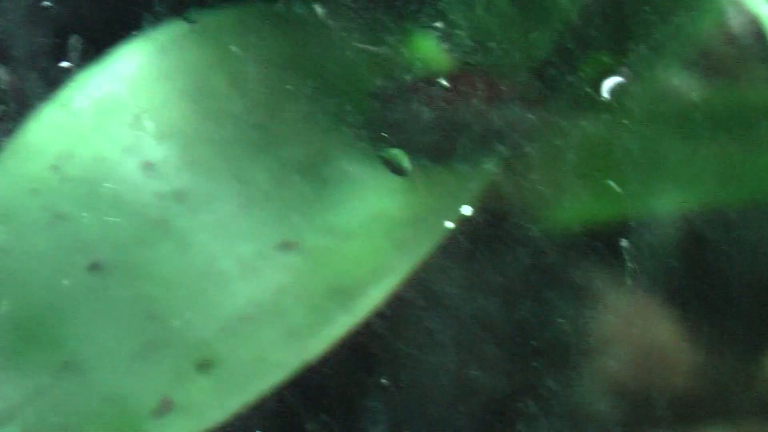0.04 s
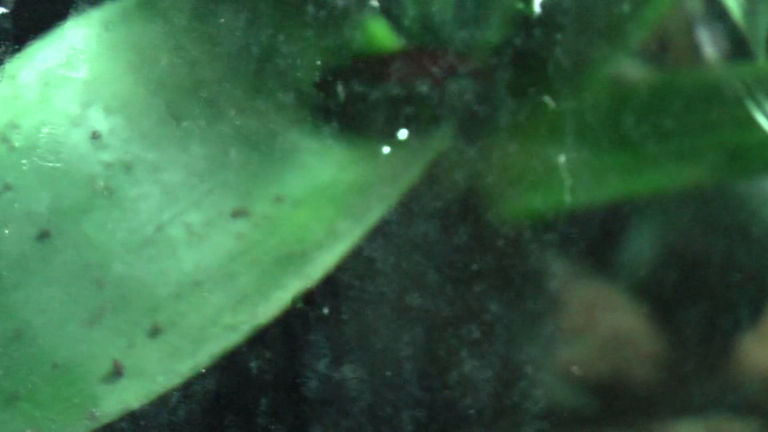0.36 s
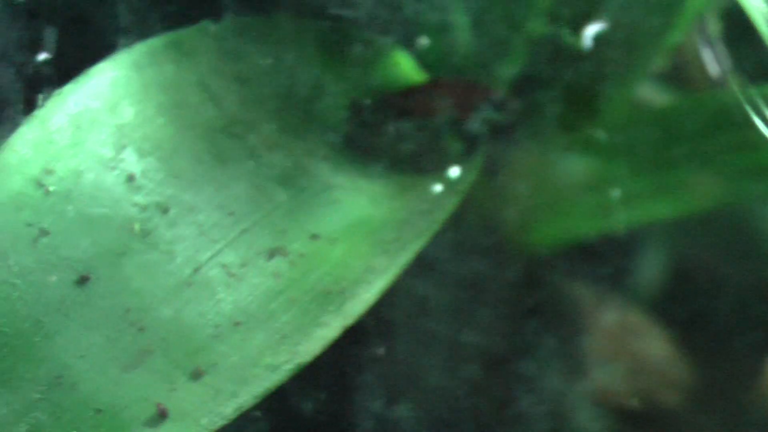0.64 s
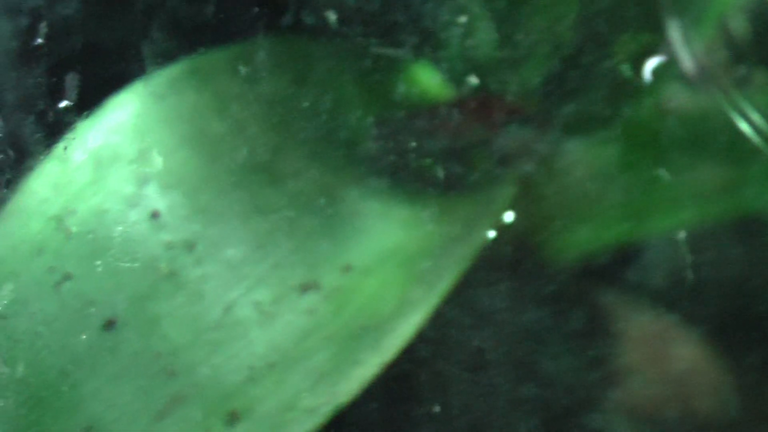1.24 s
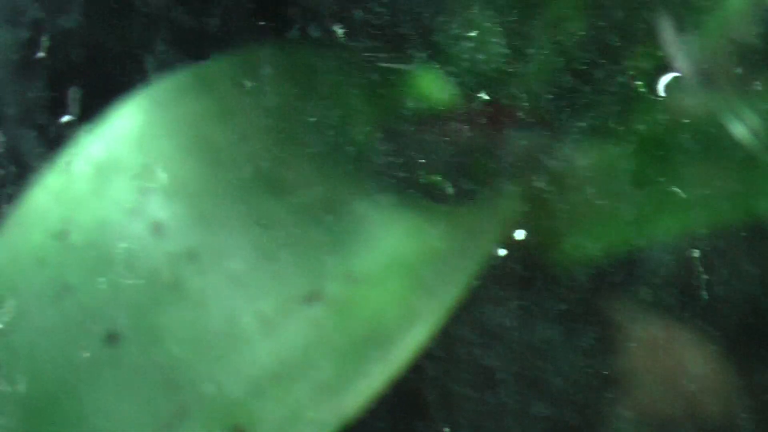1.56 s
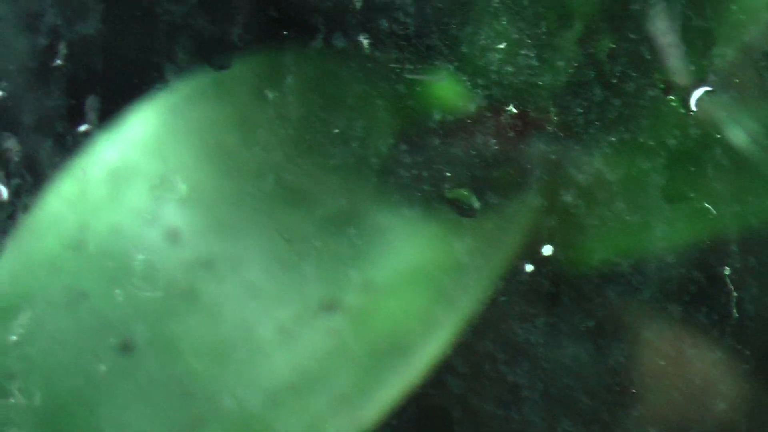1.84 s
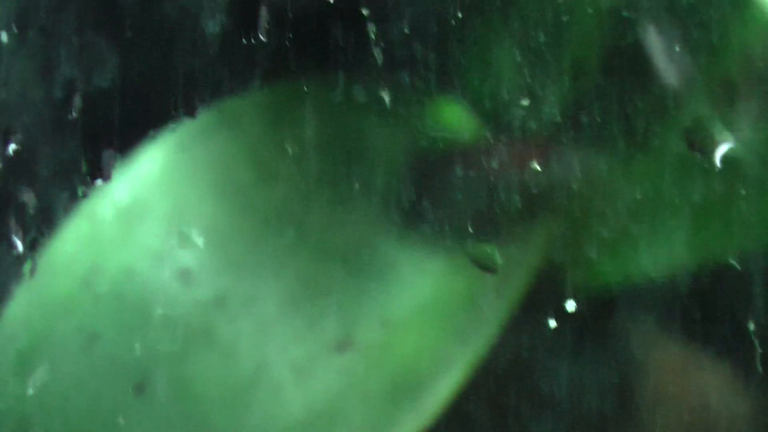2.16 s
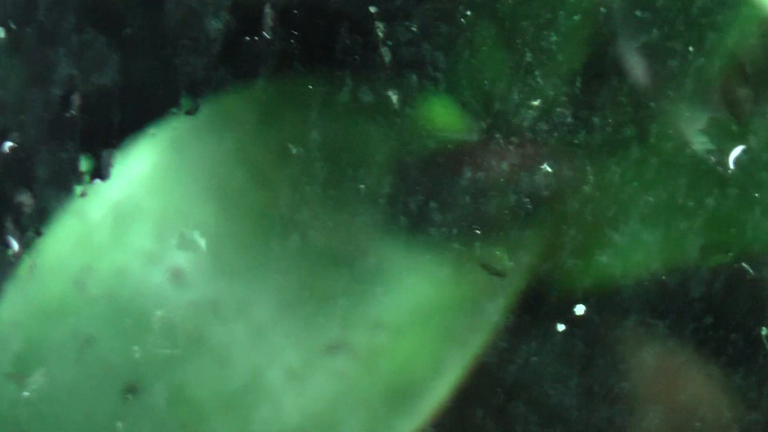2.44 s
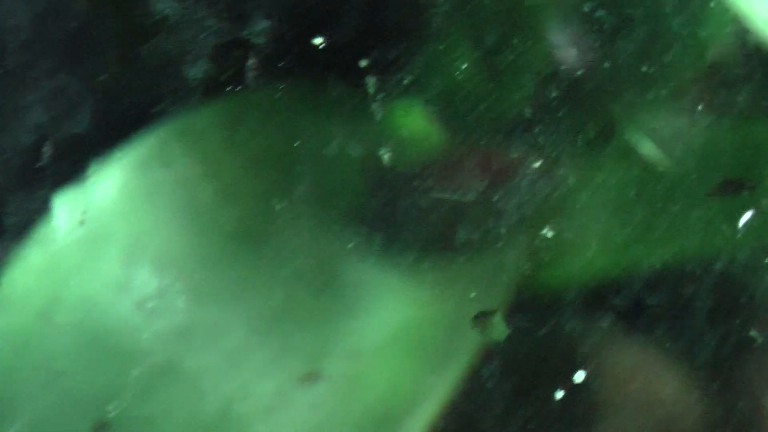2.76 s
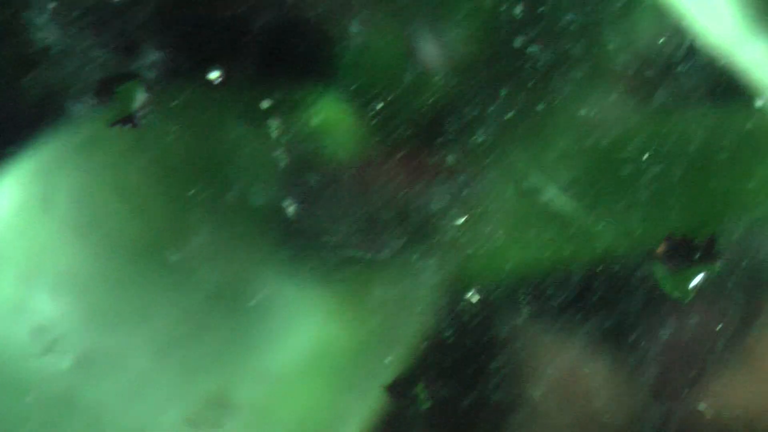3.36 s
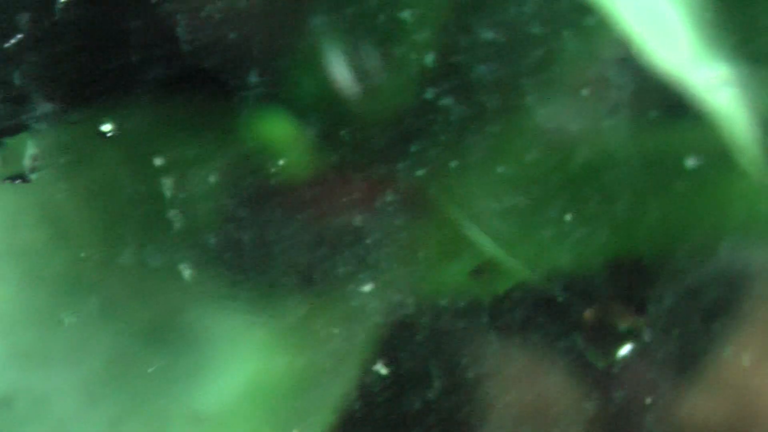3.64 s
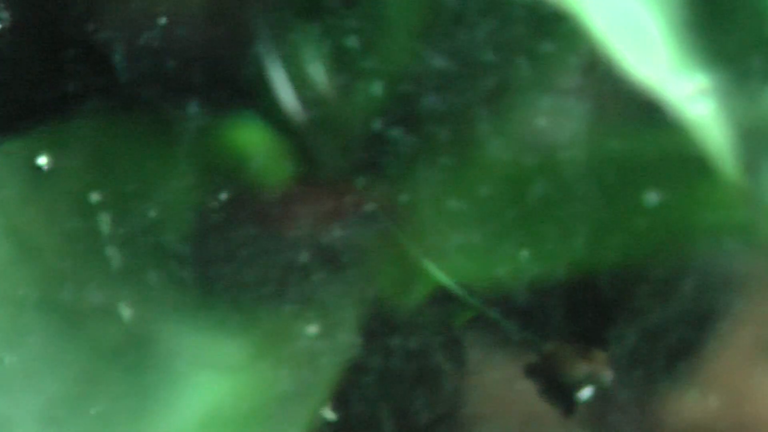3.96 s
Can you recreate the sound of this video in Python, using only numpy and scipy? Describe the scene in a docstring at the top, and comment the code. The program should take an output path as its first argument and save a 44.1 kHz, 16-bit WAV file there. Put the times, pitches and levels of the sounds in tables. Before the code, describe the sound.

A small frog trills close by for the whole four seconds, about eight bright, buzzy notes a second, ringing slightly in a glass terrarium. A quieter second frog trills higher and faster further off, also without pause. Soft knocks and dull bumps come here and there, around 0.1, 0.8, 2, 3.3 and 3.6 seconds. Faint low room noise and electrical hum lie underneath.

```python
"""A bright, buzzing trill, 8.5 notes a second: a poison frog calling inside a glass terrarium.
A second, higher frog trills faster further off. Each note is a burst of short pulses that ring the
vocal sac, and the glass tank smears them into a buzz. Behind the frogs sit a few soft knocks and
bumps, low room noise, a swelling drone and mains hum."""
import sys
import numpy as np
from scipy import signal
from scipy.fft import rfft, irfft
from scipy.io import wavfile
from scipy.ndimage import uniform_filter1d

SR = 44100
rng = np.random.default_rng(int(sys.argv[2]) if len(sys.argv) > 2 else 0)


def transcribe(u):
    """Save the signal u as a 16-bit wav file named by the first command-line argument.

    u: samples, shape (n,) or (channels, n), limited to [-1, 1]; the rate is SR.
    q: integer samples, one column per channel.
    """
    v = np.clip(np.atleast_2d(u).T, -1, 1)
    q = np.round(v * 32767).astype(np.int16)
    wavfile.write(sys.argv[1], SR, q)


N = 176400


def near_frog():
    """The lead trill: notes that swell and fade, each at a slightly different pulse rate."""
    # the call (start [s], relative level [dB], nominal sac pitch [Hz])
    notes = [(-0.019, 1.3, 5180), (0.098, 0.6, 5150), (0.216, 0.2, 5220), (0.332, 0.2, 5210),
             (0.449, -0.8, 5130.0), (0.564, -0.5, 5190), (0.68, 0, 5150), (0.798, -0.3, 5140),
             (0.917, -0.2, 5160), (1.037, 0.2, 5150), (1.15, 0.3, 5110), (1.268, 0.2, 5160),
             (1.381, 0.8, 5140), (1.499, -0.5, 5040), (1.62, 0.6, 5170), (1.746, 0, 5130),
             (1.866, -1.3, 5000), (1.986, -0.7, 5110), (2.108, 1.2, 5220), (2.225, -3.5, 5040),
             (2.344, -0.9, 5050), (2.458, 0, 5140), (2.581, -0.3, 5170.0), (2.702, 0.9, 5200),
             (2.819, -1.1, 5010), (2.936, 0.2, 5070), (3.05, 0.5, 5140), (3.174, 0.1, 5130.0),
             (3.293, 1.5, 5190), (3.407, 0.3, 5050), (3.525, 0.8, 5050), (3.646, 0, 5160),
             (3.768, 0.1, 5100), (3.888, -0.5, 5050)]
    # tone of the voice (frequency [Hz], gain [dB])
    voice_eq = [(1000, -6.5), (2200, -8), (2700, -2.5), (3350, 6), (4000, 0.5), (4500, -0.5), (4850, -4),
                (5200, -8.5), (5700, -5), (6400, -8), (7300, -4.5), (8500, 0), (10000, -1.5), (11200, 4),
                (12500, -3), (16000, -11)]
    trill = np.zeros(N)
    for (start, db, sac_hz), haste in zip(notes, rng.standard_normal(len(notes))):
        note = sac_note(length_s=0.061, attack_s=0.026, release_s=0.039,
                        pulse_hz=395 * (1 + 0.06 * haste), slowing=0.28, jitter=0.06, uneven_db=1.5,
                        sac_hz=sac_hz, scoop=0.27, scoop_s=0.0097, sag=0.13,
                        ring_s=0.00026, octave_ring_s=0.00032, octave_db=-20, bite_db=15)
        add(trill, start, amp(db) * note)
    voice = colour(trill, voice_eq)
    return amp(-46.5) * glass_tank(voice, direct_db=-5.5, modes_db=7.5, width_db=2, build_s=0.00036)


def far_frog():
    """A smaller frog further off: higher and faster, with a sharper attack."""
    # the call (start [s], relative level [dB])
    notes = [(-.03, 2.5), (0.071, -1.5), (.166, 0), (.258, -3.5), (0.344, -3), (0.445, 2), (0.549, -0.5),
             (0.645, 0.5), (.745, -0.5), (0.843, -0.5), (.943, -1), (1.039, -1.5), (1.142, -0.5),
             (1.235, -0.5), (1.336, 0.5), (1.435, 0), (1.53, 0), (1.622, -0.5), (1.72, 0), (1.822, 1),
             (1.917, 1), (2.031, -2), (2.128, -2.5), (2.226, 0.5), (2.325, 0.5), (2.416, -1.5),
             (2.521, -1.5), (2.626, -1), (2.714, -2), (2.817, 1), (2.919, -1), (3.018, 0), (3.115, -0.5),
             (3.207, -1.5), (3.303, -5.5), (3.4, -1), (3.496, -1.5), (3.598, 1), (3.701, -1.5),
             (3.797, -0.5), (3.89, 0)]
    # tone of the voice (frequency [Hz], gain [dB])
    voice_eq = [(1000, -31), (2400, -43), (3400, 6), (4500, 2.5), (5800, -0.5), (6400, -3.5), (7200, -16),
                (10000, 18.5), (13000, -38), (16000, -18)]
    trill = np.zeros(N)
    for (start, db), haste in zip(notes, rng.standard_normal(len(notes))):
        note = sac_note(length_s=0.058, attack_s=0.006, release_s=0.012,
                        pulse_hz=410 * (1 + 0.05 * haste), slowing=0.3, jitter=0.07, uneven_db=2.8,
                        sac_hz=5803, scoop=0.2, scoop_s=0.0039, sag=0.034,
                        ring_s=0.0003, octave_ring_s=0.00034, octave_db=-35, bite_db=3)
        add(trill, start, amp(db) * note)
    voice = colour(trill, voice_eq)
    return amp(-55) * glass_tank(voice, direct_db=-1.5, modes_db=12, width_db=-1, build_s=0.0042)


def sac_note(length_s, attack_s, release_s, pulse_hz, slowing, jitter, uneven_db,
             sac_hz, scoop, scoop_s, sag, ring_s, octave_ring_s, octave_db, bite_db):
    """A burst of slowing pulses, each ringing the vocal sac, whose pitch scoops up and then sags."""
    out = np.zeros(int((length_s + 0.02) * SR))
    t = np.arange(256) / SR
    ring, octave_ring = (t / tau * np.exp(-t / tau) for tau in (ring_s, octave_ring_s))
    start = 0
    for gap, size, detune in rng.standard_normal((48, 3)):
        if start >= length_s:
            break
        age, onset = start / length_s, np.exp(-start / scoop_s)
        pitch_hz = sac_hz * (1 - scoop * onset - sag * age ** 2) * (1 + 0.028 * detune)
        phase = 2 * np.pi * pitch_hz * t
        octave_gain = amp(octave_db + bite_db * onset)  # the octave bites at the front of the note
        pulse = ring * np.sin(phase) + octave_gain * octave_ring * np.sin(2 * phase)
        envelope = min((start + 0.0012) / attack_s, 1, (length_s - start) / release_s)
        add(out, start, envelope * amp(uneven_db * size) * pulse)
        start += (1 + slowing * age) / pulse_hz * np.exp(jitter * gap)
    return unit(out)


def glass_tank(voice, direct_db, modes_db, width_db, build_s):
    """The terrarium in stereo: direct sound, dense reflections off the glass and standing waves."""
    # standing waves (frequency [Hz], relative level [dB], time to fall 60 dB [s])
    modes = [(3310, -10, .18), (3442, -8, .22), (3490, -5, .2), (3591, -8, .2), (3830, -6, .22),
             (3880, -1, .22), (4082, -4, .18), (4236, -7, .22), (4319, 0, .22), (4378, -1, .24),
             (4409, -3, .17), (4572, 0, .11), (4700, -6, .12), (4940, 3, .15), (5614, -5, .17),
             (5742, -6, .17), (9290, -5, .08), (9800, -7, .08), (10180, -7, .08)]
    # decay of the reflections (frequency [Hz], time to fall 60 dB [s])
    tail_t60 = [(2500, 0.33), (4500, 0.34), (7000, 0.32), (10000, 0.22), (15000, 0.045)]
    # reflections reach left and right unequally (frequency [Hz], relative side gain [dB])
    side_eq = [(2500, -7.5), (4500, -7), (6500, -4.5), (9000, -6), (10500, -61), (12000, -29)]
    t = np.arange(SR // 3) / SR
    polarity = rng.choice([-1., 1.], (2, len(t)))
    reflections = polarity * (rng.random((2, len(t))) < 6000 / SR)  # about 6000 a second
    hz, frame_s, bands = signal.stft(reflections, SR, nperseg=128)
    bands *= amp(-60 * frame_s / curve_at(tail_t60, hz)[:, None])
    tail = signal.istft(bands, SR, nperseg=128)[1][:, :len(t)]
    tail *= 1 - np.exp(-t / build_s)
    response = tail / np.linalg.norm(tail, axis=1, keepdims=True)  # rows: mid, side
    response[0, 0] += amp(direct_db)
    for mode_hz, db, t60 in modes:
        decay = amp(-60 * t / t60)
        response[0] += 2 * amp(db + modes_db) * decay / decay.sum() * np.cos(2 * np.pi * mode_hz * t)
    mid, side = signal.fftconvolve(voice[None], response, axes=1)[:, :N]
    return unit(stereo(mid, amp(width_db) * colour(side, side_eq)))


def knocks_and_bumps():
    """Short, soft knocks and lower, duller bumps that ring longer."""
    # knocks (time [s], level [dB], pitch [Hz])
    knocks = [(.133, -49, 570), (.762, -50.5, 545), (.81, -56, 530), (1.396, -53, 580), (1.986, -50, 570),
              (2.655, -53.5, 625), (2.735, -53.5, 615), (3.043, -53.5, 598), (3.251, -48.5, 600),
              (3.614, -49.5, 600)]
    # bumps (time [s], level [dB], pitch [Hz])
    bumps = [(.13, -63, 130), (.655, -58, 139), (.8, -61, 144), (1.641, -63, 131), (2.373, -60, 124),
             (2.73, -58.5, 89)]
    return (soft_blows(knocks, rise_s=0.0012, t60=0.036, rough=1.0)
            + soft_blows(bumps, rise_s=0.0023, t60=0.16, rough=0.79))


def soft_blows(hits, rise_s, t60, rough):
    """Each blow sets off a damped resonance with a noisy edge."""
    t, out = np.arange(SR // 4) / SR, np.zeros(N)
    for start, db, hz in hits:
        noise = rng.standard_normal(len(t))
        grain = unit(uniform_filter1d(uniform_filter1d(noise, 110), 70))
        envelope = amp(db - 60 * t / t60) * (1 - np.exp(-t / rise_s))
        phase = 2 * np.pi * hz * t
        add(out, start, envelope * (np.sin(phase) + rough * grain * np.cos(phase)))
    return out


def room_tone(level_db=-63.5):
    """Low room noise and microphone hiss, nearly mono in the bass."""
    # tone of the noise (frequency [Hz], gain [dB])
    room_eq = [(20, -51), (33, -41), (48, -1.5), (85, -11), (140, -3.5), (200, -3.5), (265, -3.5),
               (380, -4.5), (520, -6), (760, -3.5), (900, -7.5), (1250, -11), (2000, -12.5), (4000, -13.5),
               (8000, -20), (14000, -20.5), (16300, -28.5)]
    # stereo image (frequency [Hz], left-right correlation [-1 to 1])
    image = [(50, 0.96), (140, 0.98), (280, 0.73), (550, 0.39), (1100, -0.43), (2000, -0.22), (6000, -0.93),
             (11000, 1), (14000, 1)]
    correlation = np.clip(curve_at(image, np.fft.rfftfreq(N, 1 / SR)), -1, 1)
    mid, side = rfft(rng.standard_normal((2, N)))
    spectrum = stereo(mid * np.sqrt(1 + correlation), side * np.sqrt(1 - correlation))
    return amp(level_db) * unit(colour(irfft(spectrum, N), room_eq))


def drone(centre_hz=275, half_width_hz=38, spread=0.12):
    """A narrow band of low noise in the room that swells and fades."""
    # the swells (time [s], level [dB])
    swells = [(0, -83), (.25, -67.5), (.5, -85), (.9, -80), (1.08, -68), (1.4, -80.5), (1.75, -75),
              (2.15, -86), (2.45, -69), (2.9, -68.5), (3.1, -68.5), (3.35, -68), (3.7, -76), (4, -79)]
    hz = np.fft.rfftfreq(N, 1 / SR)
    band = 1 / (1 + ((hz - centre_hz) / half_width_hz) ** 2)
    mid, side = irfft(rfft(rng.standard_normal((2, N))) * band, N)
    level_db = np.interp(np.arange(N) / SR, *np.transpose(swells))
    return amp(level_db) * unit(stereo(mid, spread * side))


def motor_hum(mains_hz=50, waver_rad=0.41):
    """A mains-driven motor hums, its partials wavering slightly."""
    # hum tones (frequency [multiples of mains], level [dB])
    partials = [(2, -80), (3, -85), (4, -80.5), (5, -78), (6, -89.5), (7, -80), (9, -85.5), (12.5, -82),
                (13.5, -83), (14.5, -78), (15, -79.5), (15.5, -76.5)]
    t, out = np.arange(N) / SR, np.zeros(N)
    for multiple, db in partials:
        drift = np.interp(t, np.linspace(0, N / SR, 16), rng.standard_normal(16))
        phase = 2 * np.pi * (multiple * mains_hz * t + rng.random())
        out += np.sqrt(2) * amp(db) * np.sin(phase + waver_rad * drift)
    return out


def amp(db):
    """Decibels to gain."""
    return 10 ** (np.asarray(db) / 20)


def unit(x):
    """Scales to rms 1."""
    return x / np.sqrt(np.mean(x ** 2) + 1e-20)


def stereo(mid, side):
    """Mid and side to left and right."""
    return np.array([mid + side, mid - side])


def curve_at(points, hz):
    """Reads a curve on a log-frequency axis."""
    point_hz, value = np.transpose(points)
    return np.interp(np.log(hz + 1), np.log(point_hz + 1), value)


def colour(x, eq):
    """Applies an EQ curve (frequency [Hz], gain [dB])."""
    return irfft(rfft(x) * amp(curve_at(eq, np.fft.rfftfreq(N, 1 / SR))), N)


def add(mix, start_s, sound):
    """Drops a sound into the mix, trimming any overhang."""
    at = round(start_s * SR)
    sound = sound[max(-at, 0):]
    part = mix[max(at, 0):][:len(sound)]
    part += sound[:len(part)]


def scene():
    """Both frogs over the sounds of the room."""
    return near_frog() + far_frog() + room_tone() + drone() + motor_hum() + knocks_and_bumps()


def record(dry):
    """A steep high cut at 16.4 kHz."""
    high_cut = signal.firwin(511, 16400, window=("kaiser", 9), fs=SR)
    return signal.oaconvolve(dry, high_cut[None], "same")


dry = scene()
out = record(dry)
transcribe(out)
```